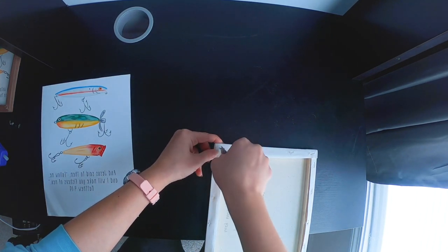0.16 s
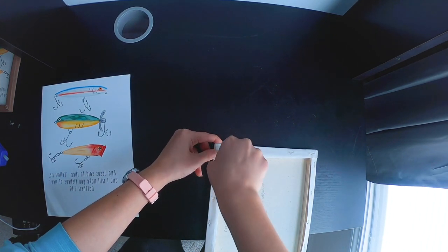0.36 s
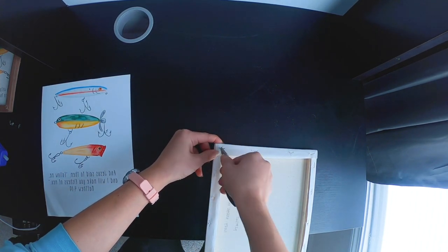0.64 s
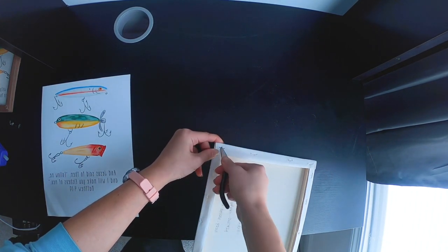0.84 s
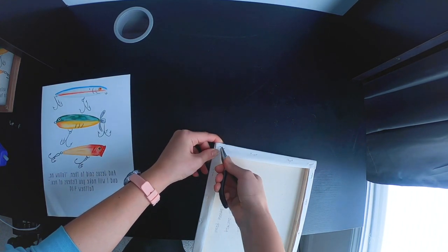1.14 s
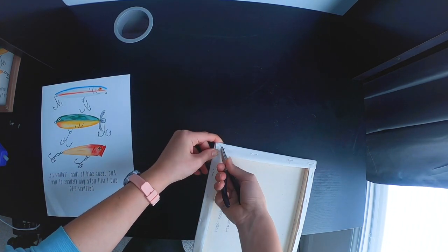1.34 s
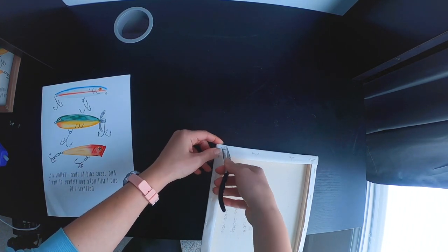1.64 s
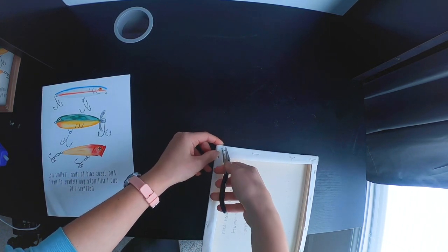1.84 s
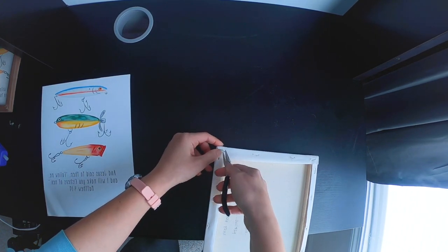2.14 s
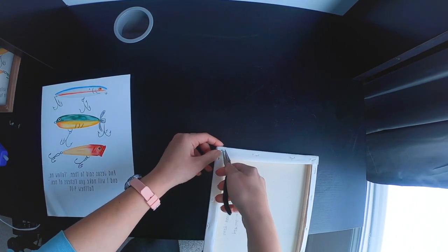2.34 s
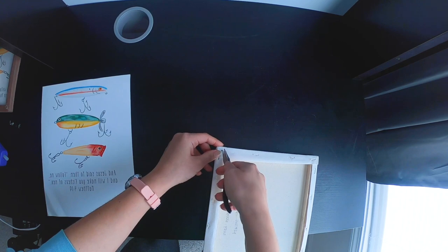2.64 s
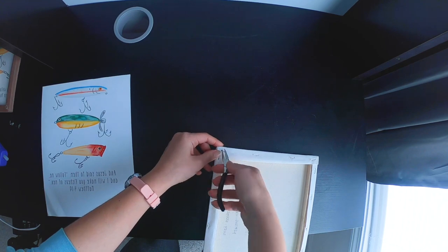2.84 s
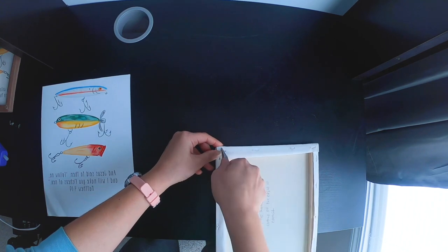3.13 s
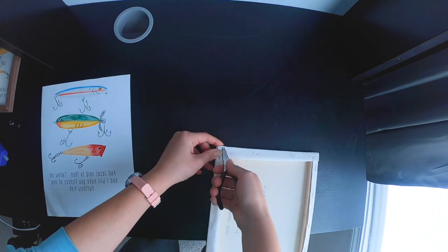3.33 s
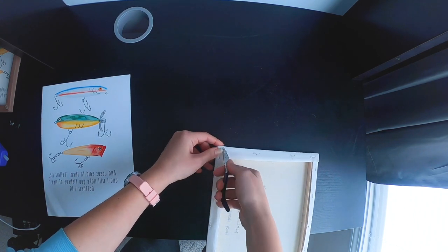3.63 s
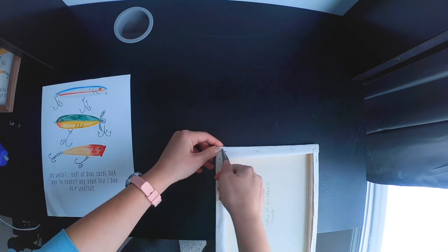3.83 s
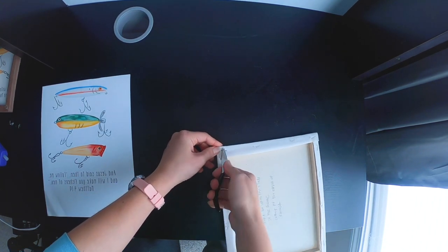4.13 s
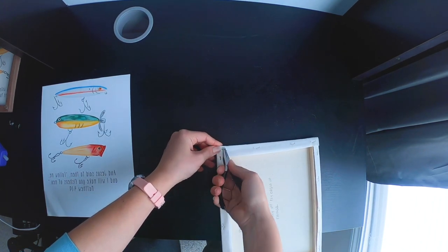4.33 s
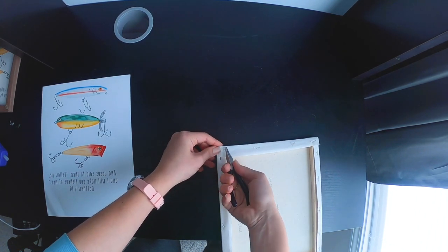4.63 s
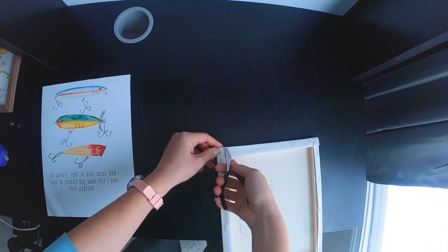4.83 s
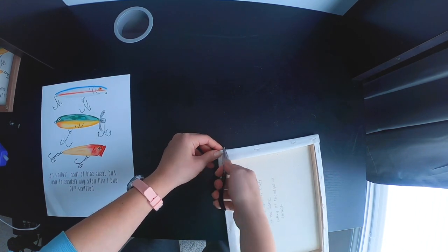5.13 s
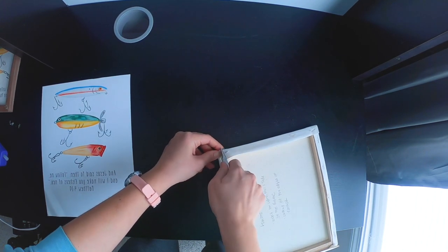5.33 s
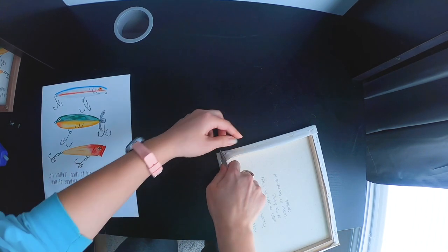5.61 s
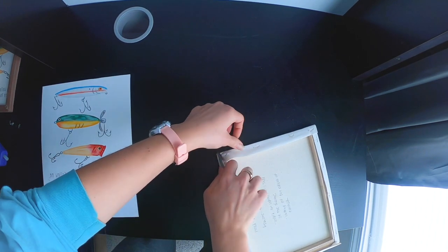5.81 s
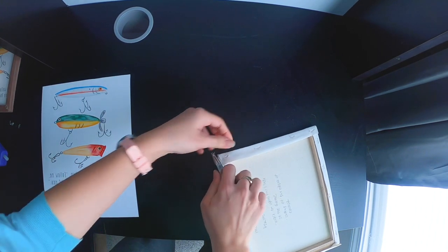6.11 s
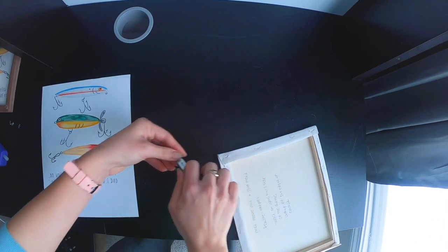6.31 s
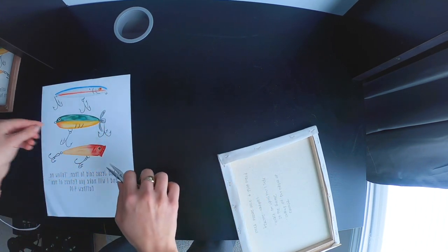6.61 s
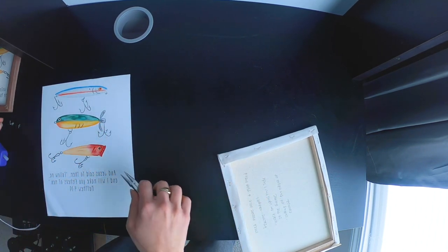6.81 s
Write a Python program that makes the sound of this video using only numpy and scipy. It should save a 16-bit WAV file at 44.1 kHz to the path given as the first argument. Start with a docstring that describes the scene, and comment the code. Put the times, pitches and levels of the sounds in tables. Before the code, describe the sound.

A quiet small room with faint low room tone, heard close in modest stereo. At 0.1 s the frame slides on a wooden table with a soft scrape, tick and knock. From 0.8 to 2.6 s pliers dig at staples: short breathy scrapes near 0.9 and 1.6, light hollow knocks, tiny jaw ticks, a cluster around 1.9. Duller thumps come at 3.0, a stronger scrape at 3.4, knocks and a tick at 3.7 to 3.8, with gritty sliding. At 4.5 s a sharp, bright metal snap leaves a short hiss. Scraping and grinding grow busier around 4.9 to 5.2; a loud woody clack hits at 5.3, followed by small rattles. Another cluster lands at 5.8 to 5.96, its hardest click at 5.92. Then near silence, faint ticks at 6.1 and 6.25, and delicate high staple tinkles at 6.35 and 6.5, fading into room tone by 7 s.

```python
"""A canvas frame starts to slide on a wooden table, with a scrape, a tick and a knock close behind.
Pliers dig staples out of it in a quiet room: knocks ring the frame's modes as dying sines, jaws tick and
snap as bursts of filtered grains, and friction grains make the hiss, the grind and the rumble of sliding.
Near the end a loose staple tinkles in the fingers through a few high resonances.
Faint noise hums below, and decaying noise gives the echoes of the room."""
import sys
import numpy as np
from scipy import signal
from scipy.fft import rfft, irfft, next_fast_len
from scipy.io import wavfile

SR = 44100
rng = np.random.default_rng(int(sys.argv[2]) if len(sys.argv) > 2 else 0)


def bounce(signal):
    """Save signal as a 16-bit WAV file at the path given by the first command-line argument."""
    frames = np.transpose(np.atleast_2d(signal))
    limited = np.clip(frames, -1, 1)
    pcm = np.round(limited * 32767).astype(np.int16)
    wavfile.write(sys.argv[1], SR, pcm)


N = 306936
FFT_SIZE = next_fast_len(N + SR)

# Knocks of the frame on the table, before width and room: (time [s], peak level [dB],
# deep modes [dB], middle modes [dB], upper modes [dB], contact [ms])
KNOCKS = [(0.136, -28.5, -0.5, -18, -11.5, 1.35), (0.378, -39, -27, -35, -10, 0.79),
          (0.942, -29, -4, -17, -26, 0.89), (1.145, -37, 6, -12, -20, 0.69),
          (1.288, -28.5, -6, -12.5, -21, 1.46), (1.342, -48, -31.5, -26.5, -8, 0.41),
          (1.446, -42, -34, -16, -35, 1), (1.657, -24.5, -2.5, -17, -22, 1.1),
          (1.817, -30, 10.5, -38, -32, 2), (1.847, -41, 10.5, -29, -26, 1.1),
          (1.899, -23.5, 3, -25, -19, 1.9), (1.93, -25.5, 11, -23, -22, 0.53),
          (1.952, -30, -15, -7, -22, 1.7), (2.154, -57, -15, -33, -31, 1.3),
          (2.275, -38.5, 0, -31, -30, 2.8), (2.349, -38, -11.5, -23, -16, 1.26),
          (2.41, -27, -8.5, -18.5, -32, 1.3), (2.624, -37, -17, -8, -11, 2.4),
          (2.864, -24.5, -38, -12, -19.5, 0.5), (2.877, -26.5, -37, -7, -21, 0.28),
          (2.99, -31.5, -13, -21, -16, 2.4), (3.014, -20, 21, -24, -31, 1.1),
          (3.023, -19, 12.5, -39, -35, 2.1), (3.081, -29.5, -36, -19, -17, 0.71),
          (3.153, -34, 0.5, -26, -12, 0.35), (3.414, -24.5, -28, -35, -15, 0.49),
          (3.714, -20.5, -18, -18, -16.5, 0.88), (3.729, -29.5, -8, -21, -4, 2.4),
          (3.812, -20, -39, -17.5, -19.5, 1.27), (3.824, -38.5, -9, 2, -21, 1.6),
          (4.323, -34.5, -32, -12, -21, 0.79), (4.407, -30.5, -3, -1, -7, 1.25),
          (4.499, -17, -37, -8.5, -11, 1.47), (4.512, -17.5, 29, -17, -17, 0.75),
          (4.55, -21, 6, -6, -13, 1.26), (4.828, -27, -44, -6.5, -18, 1.1),
          (4.938, -28.5, -31, 10, -15, 0.68), (4.945, -18.5, -26, -5.5, -23, 0.22),
          (4.959, -53.5, -12, 3, -22, 0.92), (4.999, -25.5, -13, -3, -5, 1.36),
          (5.163, -35, -4, -10, -12, 1.5), (5.275, -25, -23, -17, -26, 1.03),
          (5.293, -10.5, -4, -12.5, -29, 0.91), (5.312, -15.5, 1, -7, -24, 1.2),
          (5.328, -24, -18, -5, -20, 0.99), (5.409, -32, -16, -2, -8, 1.4),
          (5.438, -27, -11, -17, -21, 1.9), (5.496, -32, -45, -9.5, -9, 1.55),
          (5.804, -23.5, 7, -33, -21, 2.2), (5.84, -27.5, 6, -15, -1, 1.6),
          (5.917, -13.5, -39, -15.5, -11, 1.4), (5.929, -18, 10, -8.5, -22, 2.1),
          (5.961, -23, -8, -26, -24, 1.4)]
# Ticks and snaps of the jaws, before width and room: (time [s], peak level [dB], strongest pitch [Hz],
# loss away from it [dB per octave], time to fall by about 22 dB [ms], left over right [dB])
SNAPS = [(0.1166, -52, 5470, 6, 11, 0.5), (0.133, -56, 1660, 4, 8.6, 0.0), (0.377, -55, 1380, 2, 7.9, 1.5),
         (0.6754, -62, 5120, 11, 10, 1.0), (0.763, -64, 2110, 1, 10, 5), (1.1443, -55, 1480, 4, 8.7, 1.0),
         (1.2869, -36, 1480, 2, 12.4, 0), (1.3405, -62, 1360, 6, 10, 2.5), (1.3994, -62, 1390, 0, 13, 0.0),
         (1.4481, -63, 1730, 2, 15, 1.5), (1.713, -41.5, 3800, 8, 12, 0.5),
         (1.8134, -47.5, 3800, 8, 7.7, -1), (1.959, -43, 5100, 8, 8.1, 0.5),
         (2.1516, -70, 1460, 3, 10, -0.5), (2.2748, -58, 6790, 6, 8.5, -0.5),
         (2.4114, -59, 1450, 0, 8.5, 0.5), (2.618, -60, 1330, 3, 14, 3), (2.863, -49, 1490, 2, 15, -0.5),
         (2.8754, -45.5, 5100, 6, 11, 1.5), (2.9916, -49, 1320, 1, 10, 3), (3.015, -52, 1420, 2, 10, -3),
         (3.0475, -62, 1370, 6, 8.7, 1.0), (3.0814, -51, 1400, 6, 11, 0.5), (3.1548, -47, 2670, 3, 10, -2),
         (3.4107, -36, 1920, 2, 14, 0.5), (3.713, -42, 1480, 5, 13, 0.5), (3.768, -53, 1350, 4, 8.3, -0.5),
         (3.8114, -43.5, 1460, 6, 14, -2), (4.4062, -45.5, 2230, 7.5, 10.3, 0.5),
         (4.4764, -48.5, 5410, 6, 11.2, 3), (4.4877, -34, 5440, 5.5, 8.1, 5.5),
         (4.4979, -9, 6630, 6.5, 10.9, 1.0), (4.9425, -42.5, 1530, 3, 10, 0.5),
         (5.004, -43, 3280, 6, 10, 0.5), (5.1522, -54, 1330, 5.5, 8.8, 0.0),
         (5.1924, -36, 8890, 7.5, 9.2, -1), (5.3131, -13, 2040, 5.5, 9, -0.5),
         (5.4101, -47, 1510, 6, 10.7, 0.5), (5.4595, -47, 3367, 5, 14, 0.5),
         (5.8316, -37.5, 3610, 6, 16, 2.5), (5.8411, -28, 2020, 5.5, 20.3, 2),
         (5.8483, -33, 3040, 5.5, 11.4, 3.5), (5.859, -42, 1980, 7.5, 10, 1.5),
         (5.916, -10.5, 3617, 6, 12, 0.0), (5.9571, -30.5, 1350, 3, 11.4, 0.0),
         (6.0941, -48, 2017, 2, 10.4, 0), (6.2534, -63.5, 1370, -1, 10.3, -0.5)]
# Rubs of the loose staple: (time [s], gain of the contact grains [dB], time to fall by about 22 dB [ms])
TINKLES = [(6.339, -63, 10), (6.3605, -54, 9.1), (6.3693, -46.5, 7.4), (6.513, -63, 8.3), (6.5225, -57, 15)]
# Scrapes of jaws and fingers on the canvas, and at 4.5 s the bright hissing tail of the loud snap:
# (start [s], rise [s], hold [s], fall [s], hiss level [dB],
# then relative to the hiss: treble [dB], three rasp resonances [dB, dB, dB])
STROKES = [(0.105, 0.011, .01, 0.12, -75, -4, -2, -17, -5),
           (0.2, 0.028, 0.056, .05, -81.5, -22, -8, -17, -2),
           (0.42, 0.061, .01, 0.085, -81, -26, 2.5, -27, -21),
           (0.813, 0.076, 0.037, 0.046, -58, 2.5, -16, -4.5, -23),
           (1.13, 0.016, 0.044, 0.087, -74.5, -6.5, 2, -9, -15),
           (1.27, 0.019, 0.0077, 0.063, -66, -5, -1, -6, -12),
           (1.33, .012, .01, 0.045, -75, -20, 8, -15, -15), (1.42, 0.03, .01, 0.09, -80, -19, 4, -6, -19),
           (1.533, 0.098, 0.045, .09, -57, -6.5, -30, -8.5, -22),
           (1.78, 0.042, 0.013, 0.057, -72, -10, -18, 1, -11),
           (1.83, 0.056, .14, 0.056, -65, -2.5, -20, -8, -19),
           (2.12, 0.084, .01, .04, -87, 0, -19, -14, -11), (2.26, .013, .005, .03, -86, 3, -25, -16, -16),
           (2.29, .075, .01, .17, -83.5, -7, -23, 1, 4),
           (2.586, 0.045, 0.0067, 0.028, -74, -6, -2, -18, -4),
           (2.972, 0.019, 0.0043, 0.051, -67.5, -13, -4, -21, -2),
           (3.0, 0.072, 0.18, .05, -72, -1, -5, -14, -21),
           (3.12, 0.068, 0.044, .07, -62, -4, -23, -23, -25),
           (3.314, 0.11, 0.01, 0.099, -53, -1, -23, -16, -26),
           (3.63, 0.09, .005, 0.071, -67.5, -13, -5, -23, -18),
           (3.72, 0.14, 0.25, 0.049, -61.5, -5, -5, -18, -28),
           (4.15, 0.078, 0.06, 0.11, -60, -1, -6, -31, -27),
           (4.393, 0.03, 0.0036, 0.041, -67, -40, -6, -25, -28),
           (4.5, 0.0075, 0.018, 0.19, -57.5, -0.5, -16.5, -20.5, -5.5),
           (4.836, 0.038, 0.038, 0.041, -70.5, -10, -13.5, -11.5, -9.5),
           (4.918, 0.025, 0.0038, 0.036, -52.5, -6, -6, -29, -17),
           (4.969, 0.039, 0.069, 0.046, -54.5, -19, -12, -13, -8),
           (5.125, 0.084, 0.044, 0.035, -62, -0.5, -15.5, -7, -23.5),
           (5.21, 0.083, .005, 0.099, -54, -5, 1, -31, -25),
           (5.35, 0.034, .09, .03, -60, -31, -8, -18, -26),
           (5.465, 0.042, 0.061, 0.055, -65.5, -3, -10, -7, -26),
           (5.65, .1, 0.055, 0.025, -80, -8, -9, -11.5, -16),
           (5.807, 0.013, 0.028, .05, -70, -7, -13, -11, -13),
           (5.875, 0.022, 0.012, 0.033, -66, -26, -5, -7, -24),
           (5.92, 0.027, 0.11, 0.04, -60, -8.5, -12, -18.5, -29.5),
           (6.325, 0.038, 0.016, .03, -77, -4, -23, -22.5, -9),
           (6.475, 0.054, 0.0043, 0.032, -77, 1.5, -13, -15.5, -10)]
# Faint rubbing between strokes: (hiss level [dB], treble [dB], three rasp resonances [dB, dB, dB])
RESTING_RUB = (-85.5, -6, -6.5, -18, -18)
# Frame shoved over the table: (start [s], rise [s], hold [s], fall [s],
# grind in the wood [dB], rumble in the table [dB])
SHOVES = [(0.03, .13, 0.016, 0.31, -72, -49.5), (0.4, 0.056, 0.27, 0.4, -77.5, -58.5),
          (0.86, 0.24, 0.15, 0.33, -65.5, -53), (1.42, 0.27, 0.0084, 0.13, -84, -43),
          (1.8, 0.15, 0.011, 0.2, -71, -45.5), (2.22, 0.17, .01, 0.23, -96, -50),
          (2.48, 0.18, 0.014, 0.092, -71.5, -56.5), (2.84, 0.035, .01, 0.096, -85, -40),
          (2.94, 0.062, .005, 0.073, -58, -45.5), (3.05, 0.077, 0.29, 0.071, -78, -56),
          (3.33, 0.12, .01, 0.12, -58.5, -48.5), (3.63, 0.14, 0.074, 0.041, -76, -46.5),
          (3.82, 0.087, 0.051, 0.71, -62, -46.5), (4.28, 0.24, 0.015, 0.24, -61.5, -51),
          (4.86, .14, 0.0073, 0.23, -51, -41), (5.14, 0.085, 0.11, 0.12, -57.5, -45.5),
          (5.36, 0.05, 0.023, 0.3, -65, -49.5), (5.75, 0.23, 0.014, 0.2, -63, -42)]
# Faint creak of the frame at rest: (grind [dB], rumble [dB])
RESTING_CREAK = (-81.5, -69)
# Modes of frame and table, ring times when free: (frequency [Hz], level [dB], t60 [s])
FRAME_MODES = [(107.5, -7.5, 0.25), (138.6, 3, 0.15), (147.9, 2, 0.04), (220, -10, 0.088),
               (222.3, -9.5, 0.21), (275.8, -2, 0.09), (321, -10.5, 0.11), (384.7, -3, 0.09),
               (430, 3.5, 0.033), (543.3, 1.5, 0.21), (634, 0, 0.12), (676, 3, 0.11), (774, 3.5, 0.11),
               (857.2, 6, 0.15), (1061.5, -15, 0.21), (1184, -11.5, 0.27), (1200, 3, 0.016)]
# Modes of the staple: (frequency [Hz], level for each grain of contact [dB], t60 [s])
STAPLE_MODES = [(2894, -55.5, 0.0072), (4930, -23.5, 0.024), (7450, -46, 0.0076), (8230, -18, 0.019),
                (9840, -26.5, 0.016)]
# Rasp resonances of the jaws: (frequency [Hz], width [Hz])
JAW_RESONANCES = [(1430, 130), (3760, 69), (5250, 220)]
# Relative spectrum of the hiss, its halves rescaled later: (frequency [Hz], density [dB per Hz])
HISS_SPECTRUM = [(290, -28.5), (500, 2.5), (668, -1), (729, 3), (855, -5.5), (1020, -6), (1440, -8.5),
                 (1640, -6.5), (3860, -7.5), (8700, -19), (14000, -40.5), (16000, -50.5)]
# Relative spectrum of the snaps, each band rescaled later: (frequency [Hz], density [dB per Hz])
SNAP_SPECTRUM = [(530, -32), (900, -11), (1340, -5), (1710, -14.5), (2020, -5), (2340, -8.5), (3410, -4),
                 (3710, -5), (4900, -3), (6710, -5), (7570, -12), (8970, -4.5), (12000, -33.5),
                 (13900, -28), (16200, -46)]
# Relative spectrum of the room tone: (frequency [Hz], density [dB per Hz])
HUM_SPECTRUM = [(12, -31), (20, 9), (60, 13), (87, -32.5), (120, 10.5), (161, 13.5), (299, -13.5),
                (599, -23), (871, -15), (1020, -34), (1340, -36.5), (4700, -44), (5670, -82.5), (8700, -31),
                (12000, -66.5), (15600, -63), (22000, -120)]
# Stereo width of the near sounds: (frequency [Hz], side over mid [dB])
NEAR_WIDTH = [(60, -29.5), (110, -25.5), (200, -61.5), (380, -17), (700, -2), (1290, -2.5), (2380, -8),
              (4400, -9.5), (8120, 0), (15000, -2)]
# Stereo width of the room tone: (frequency [Hz], side over mid [dB])
HUM_WIDTH = [(60, -16), (110, -33), (200, -5.5), (380, 5.5), (700, 10), (1290, 18.5), (2380, 11.5),
             (4400, 5), (8120, 3.5), (15000, 1)]

STROKE_EDGE, SHOVE_EDGE = 3.32, 3.0  # the higher, the later a gesture swells and the sooner it fades
GRIP_DAMPING = 0.5  # hands on the frame shorten the ring of its higher modes to this share
HUM_DB = -57.5
ROOM_T60_S, ROOM_DB = 0.27, -10
BASS_CUT_HZ = 136  # high-pass that thins the bass of the near sounds
STOPBAND_HZ = 16300


def knocks():
    """Modal excitation: a smooth push and a dying chatter strike modes that vary with grip and spot."""
    hz, mode_db, t60 = np.transpose(FRAME_MODES)[:, :, None]
    t60 = np.where(hz > 430, GRIP_DAMPING * t60, t60)
    t = np.arange(round(0.4 * SR)) / SR
    chance = rng.standard_normal((len(KNOCKS), 3, len(FRAME_MODES), 1))
    chatter_db = -34.5 - 60 * t[:3000] / 0.053
    chatter = rng.standard_normal((len(KNOCKS), 3000)) * from_db(chatter_db)
    chatter[:, 0] = 1  # the push itself
    out = np.zeros(N + SR)
    for row, (detune, strength, late), touches in zip(KNOCKS, chance, chatter):
        s, peak_db, deep_db, middle_db, upper_db, contact_ms = row
        region_db = np.select([hz < 180, hz < 430, hz < 660], [deep_db, 0, middle_db], upper_db)
        age = np.maximum(t - 0.00054 * np.abs(late), 0)
        level_db = mode_db + region_db + 3.3 * strength - 60 * age / t60
        modes = from_db(level_db) * np.sin(2 * np.pi * hz * (1 + 0.022 * detune) * age)
        push = np.hanning(max(round(contact_ms * SR / 1000), 3) + 2)
        sound = signal.fftconvolve(modes.sum(axis=0), np.convolve(push, touches))
        at = round(s * SR)
        out[at:at + len(sound)] += from_db(peak_db) * sound / np.abs(sound).max()
    return out[:N]


def snaps():
    """Impulsive release: short dying bursts of rattle, each with its own colour and side."""
    # two rattles by turns, so that neighbouring bands rattle apart
    rattle = colour(np.array([grains(14000, 3.5), grains(14000, 3.5)]), SNAP_SPECTRUM)
    edges_hz = [900, 1500, 2400, 3400, 4800, 7200, 16000]
    centres_hz = np.array([1200, 1900, 2900, 4000, 6000, 9000])
    parts = [rms_one(band(rattle[k % 2], edges_hz[k], edges_hz[k + 1])) for k in range(6)]
    parts = np.array(parts)
    out = np.zeros((2, N))
    for s, peak_db, hz, loss_db, length_ms, pan_db in SNAPS:
        at, shape = burst(s, length_ms)
        band_gains = from_db(-loss_db * np.abs(np.log2(centres_hz / hz)))
        sound = shape * (band_gains @ parts[:, at])
        sound = from_db(peak_db) * sound / np.abs(sound).max()
        out[:, at] += sound * from_db([[pan_db / 2], [-pan_db / 2]])
    return out


def tinkles():
    """Resonance under friction: a staple rubbed between the fingers rings in a few high modes."""
    rub, contact = grains(8000, 3.1), np.zeros(N)
    for s, gain_db, length_ms in TINKLES:
        at, shape = burst(s, length_ms)
        contact[at] += from_db(gain_db) * shape * rub[at]
    return sum(from_db(db) * ring(contact, hz, t60) for hz, db, t60 in STAPLE_MODES)


def slide(pressure):
    """Dry friction: fine grains hiss under uneven pressure, coarse grains shake the frame modes."""
    strokes = [(*row[:5], *(row[4] + np.array(row[5:]))) for row in STROKES]
    rub_db = RESTING_RUB[0]
    resting = [rub_db, *(rub_db + np.array(RESTING_RUB[1:]))]
    body_gain, treble_gain, *rasp_gains = gestures(strokes, resting, STROKE_EDGE)
    grind_gain, rumble_gain = gestures(SHOVES, RESTING_CREAK, SHOVE_EDGE)

    fine = colour(grains(12000, 3.5), HISS_SPECTRUM)
    low, high = split(fine, 8000)
    rasp = sum(gain * resonance(fine, *row) for gain, row in zip(rasp_gains, JAW_RESONANCES))
    # opposite signs join the halves without a dip
    hiss = pressure * (body_gain * rms_one(low) - treble_gain * rms_one(high) + rasp)

    coarse = grains(1900, 5.3)
    # the mode at 430 Hz belongs to neither group
    deep = [from_db(db) * ring(coarse, hz, t60) for hz, db, t60 in FRAME_MODES if hz < 430]
    upper = [from_db(db) * ring(coarse, hz, 0.3 * t60) for hz, db, t60 in FRAME_MODES if hz > 430]
    return hiss + grind_gain * rms_one(sum(upper)) + rumble_gain * rms_one(sum(deep))


def hum():
    """Stationary noise: steady room tone, widest around 1.3 kHz."""
    mid, side = colour(rng.standard_normal((2, N)), HUM_SPECTRUM)
    both = mid + colour(side, HUM_WIDTH) * [[1], [-1]]
    return from_db(HUM_DB) * rms_one(both)


def echoes(x, t60):
    """Diffuse reverberation: convolve with exponentially dying noise of energy 1."""
    t = np.arange(round(t60 * SR)) / SR
    tail = rng.standard_normal(len(t)) * from_db(-60 * t / t60)
    return signal.fftconvolve(x, tail / np.sqrt(np.sum(tail ** 2)))[:N]


def gestures(rows, rest_db, edge):
    """Addition of powers: gestures swell, hold and fade over a resting level; one gain per column."""
    table = np.array(rows)
    start, rise, hold, fall = table[:, :4].T[:, :, None] + 1e-4  # no time is zero
    t = np.arange(0, N + 64, 64) / SR
    swell = (t - start) / rise
    fade = 1 + (start + rise + hold - t) / fall
    reach = np.clip(np.minimum(swell, fade), 0, 1)
    shape = np.sin(np.pi / 2 * reach) ** (2 * edge)
    power = from_db(table[:, 4:].T) ** 2 @ shape + from_db(rest_db)[:, None] ** 2
    return [np.interp(np.arange(N) / SR, t, np.sqrt(p)) for p in power]


def flicker(rate_hz):
    """Low-passed chance: a slow random curve of rms 1."""
    r = np.exp(-2 * np.pi * rate_hz / SR)
    return rms_one(signal.lfilter([1], [1, -2 * r, r * r], rng.standard_normal(N + SR))[SR:])


def burst(s, length_ms):
    """Transient envelope: place and shape of a short event, quick rise and exponential decay."""
    t = np.arange(round(0.12 * SR)) / SR * 1000 / max(length_ms, 1)
    at = round(s * SR)
    return slice(at, at + len(t)), (1 - np.exp(-30 * t)) * np.exp(-2.5 * t)


def grains(per_s, spread_db):
    """Shot noise: random clicks of uneven size and sign, rms 1."""
    sizes = from_db(spread_db * np.minimum(rng.exponential(1, N), 4)) * rng.choice([-1, 1], N)
    return rms_one(sizes * (rng.random(N) < per_s / SR))


def ring(x, hz, t60):
    """Damped oscillator: a unit click sets a dying sine of initial height 1 ringing."""
    r, w = from_db(-60 / (t60 * SR)), 2 * np.pi * hz / SR
    return signal.lfilter([0, np.sin(w)], [1, -2 * r * np.cos(w), r * r], x + 1e-18)


def resonance(x, hz, width_hz):
    """Selective response: what one resonance passes of a sound, rms 1."""
    r = np.exp(-np.pi * width_hz / SR)
    poles = [1, -2 * r * np.cos(2 * np.pi * hz / SR), r * r]
    return rms_one(signal.lfilter([1, 0, -1], poles, x))


def colour(x, points, turn=1):
    """Linear filtering: weight the spectrum by (Hz, dB) points; turn = 1j adds a quarter cycle of phase."""
    hz, db = np.transpose(points)
    log_hz = np.log(np.fft.rfftfreq(FFT_SIZE, 1 / SR) + 1)
    gain = from_db(np.interp(log_hz, np.log(hz), db))
    return irfft(rfft(x, FFT_SIZE) * gain * turn, FFT_SIZE)[..., :N]


def split(x, hz):
    """Crossover: low and high part of a sound."""
    filters = [signal.butter(2, hz, kind, fs=SR, output="sos") for kind in ("low", "high")]
    return [signal.sosfilt(sos, x) for sos in filters]


def band(x, low_hz, high_hz):
    """Band-pass filtering: keep what lies between two frequencies."""
    return signal.sosfilt(signal.butter(2, [low_hz, high_hz], "band", fs=SR, output="sos"), x)


def from_db(db):
    """Logarithmic level: decibels to amplitude gain."""
    return 10 ** (np.asarray(db) / 20)


def rms_one(x):
    """Effective value: scale to rms 1."""
    return x / np.sqrt(np.mean(x ** 2) + 1e-20)


def scene():
    """Superposition: hits have a phase-turned side, rubbing along the frame an independent one; echoes add."""
    hits = knocks() + tinkles() + snaps()
    pressure = from_db(1.2 * flicker(45) + 1.4 * flicker(9))
    hit_side = colour(hits.mean(axis=0), NEAR_WIDTH, turn=1j)
    slide_side = colour(slide(pressure), NEAR_WIDTH)
    near = hits + slide(pressure) + (hit_side + slide_side) * [[1], [-1]]
    near = split(near, BASS_CUT_HZ)[1]
    walls = band(near.mean(axis=0), 260, 8900)
    room = np.array([echoes(walls, ROOM_T60_S), echoes(walls, ROOM_T60_S)])
    return near + from_db(ROOM_DB) * room + hum()


def record(dry):
    """Band limitation: a steep low-pass, 70 dB down from the stopband edge upward."""
    return signal.sosfilt(signal.cheby2(12, 70, STOPBAND_HZ, fs=SR, output="sos"), dry)


dry = scene()
out = record(dry)
bounce(out)
```